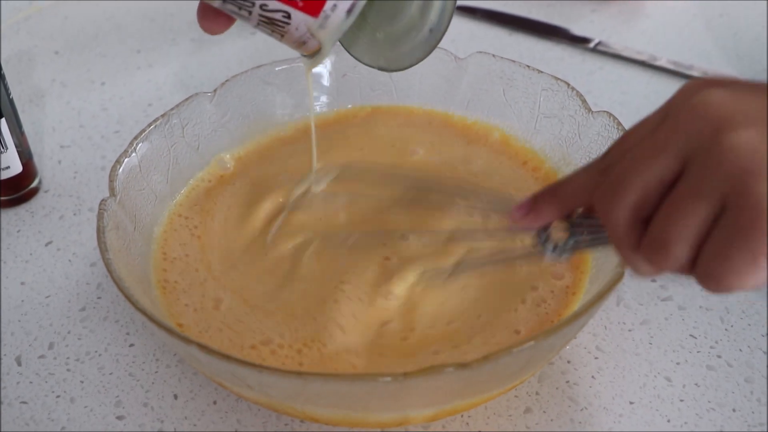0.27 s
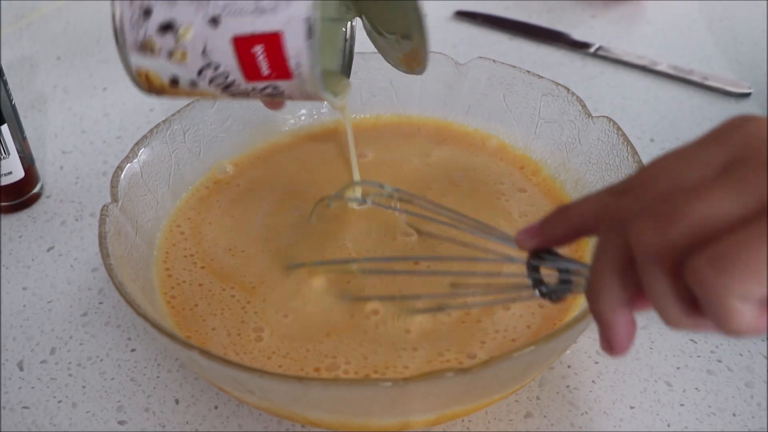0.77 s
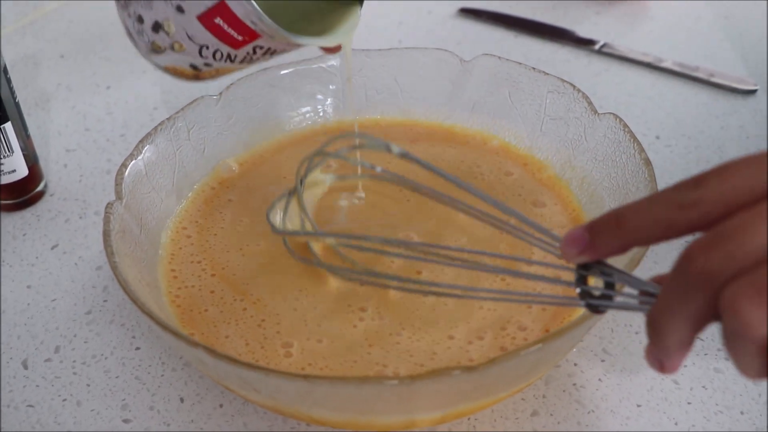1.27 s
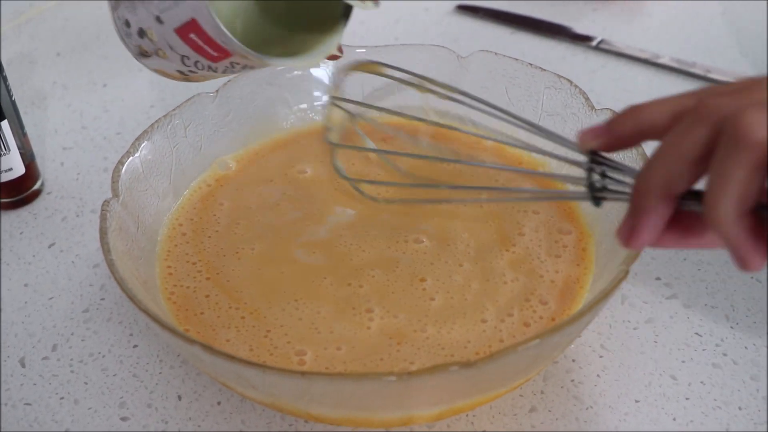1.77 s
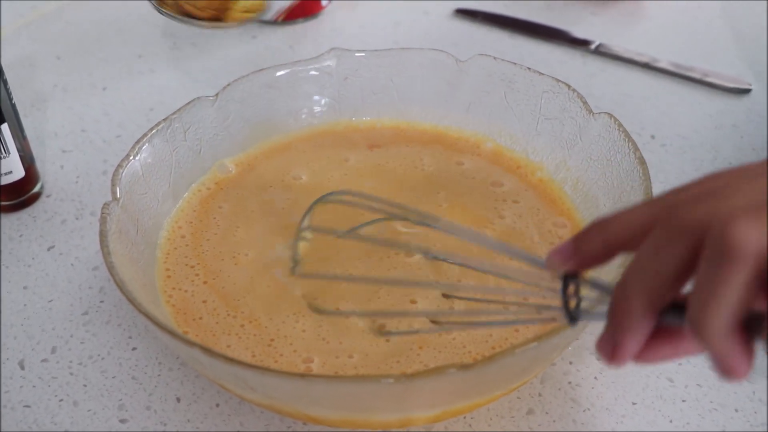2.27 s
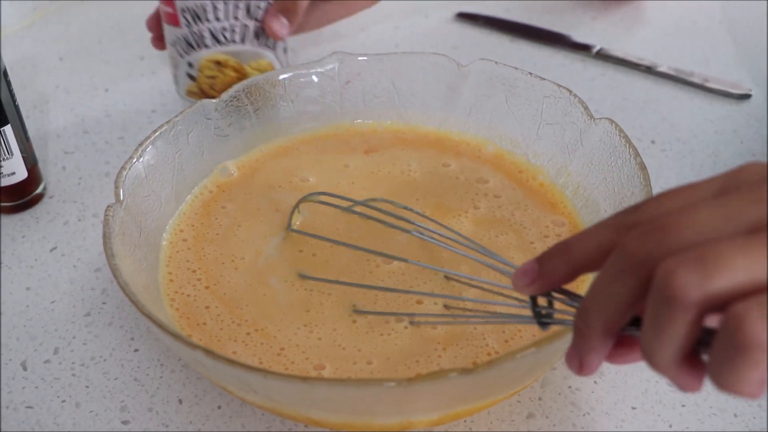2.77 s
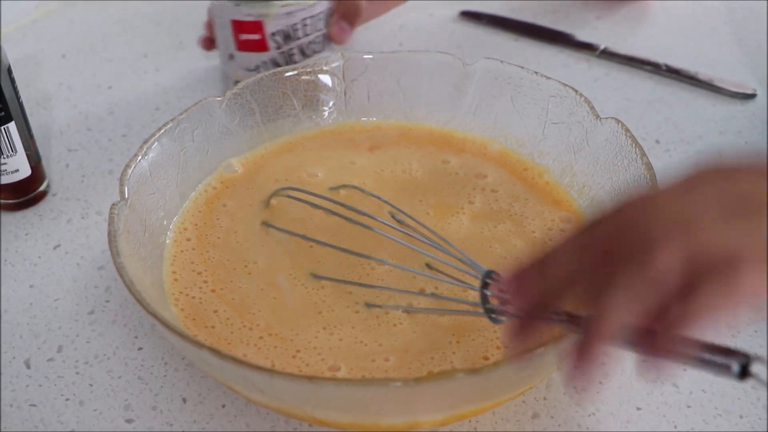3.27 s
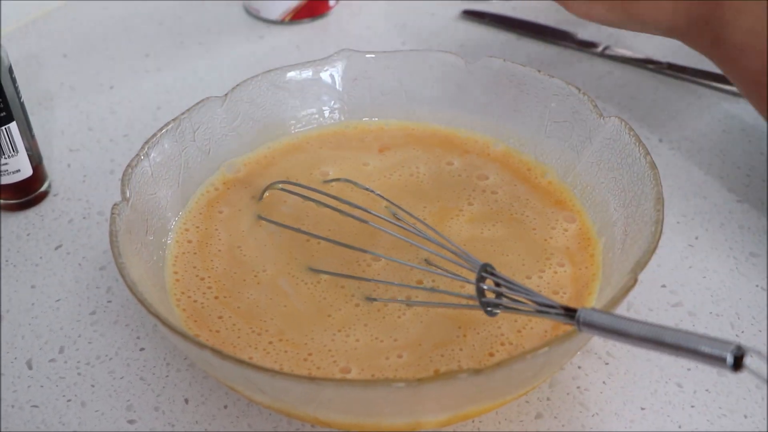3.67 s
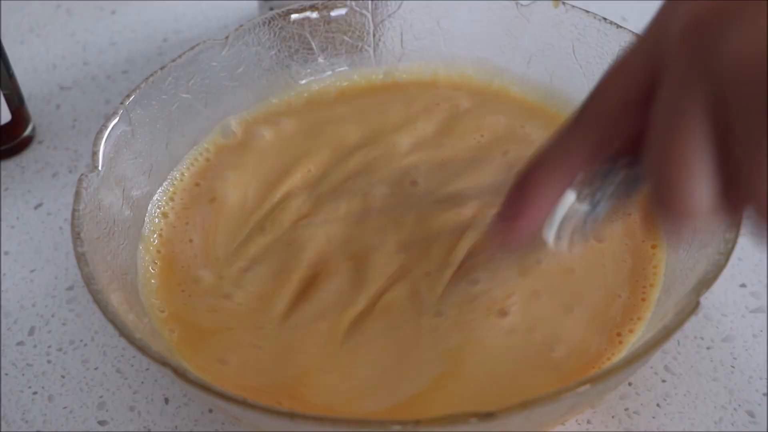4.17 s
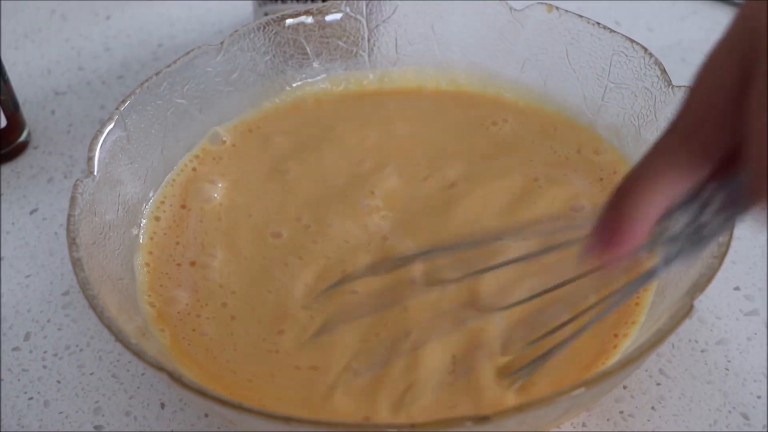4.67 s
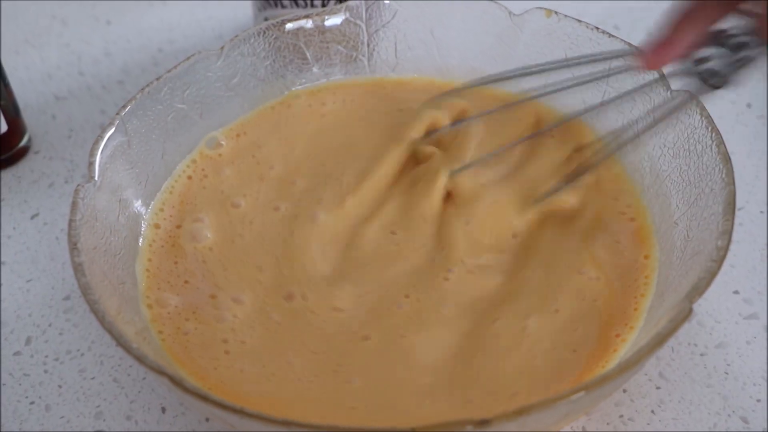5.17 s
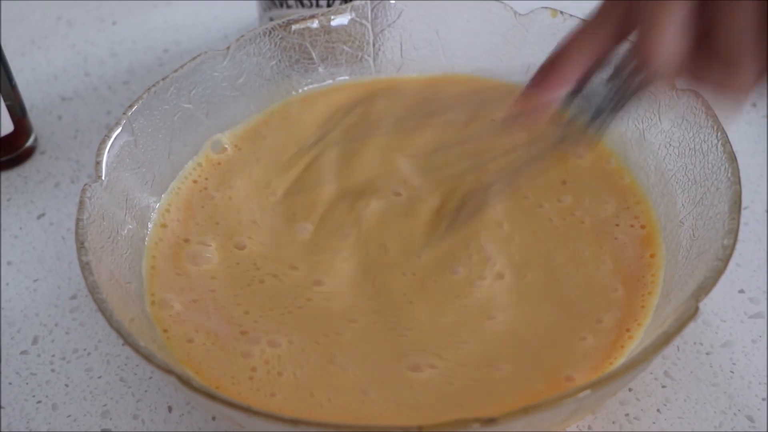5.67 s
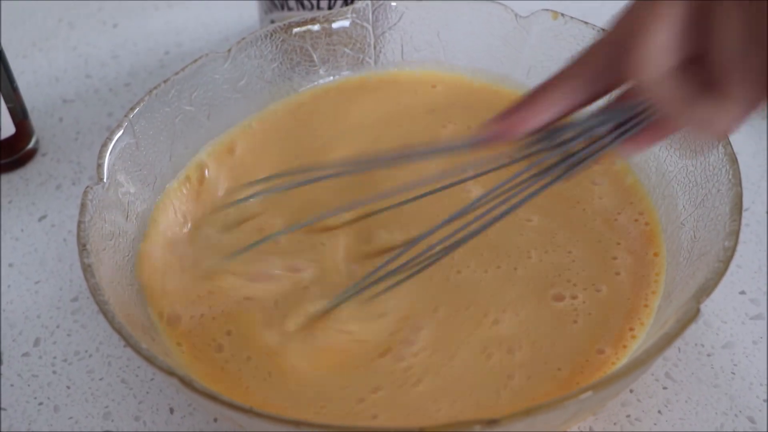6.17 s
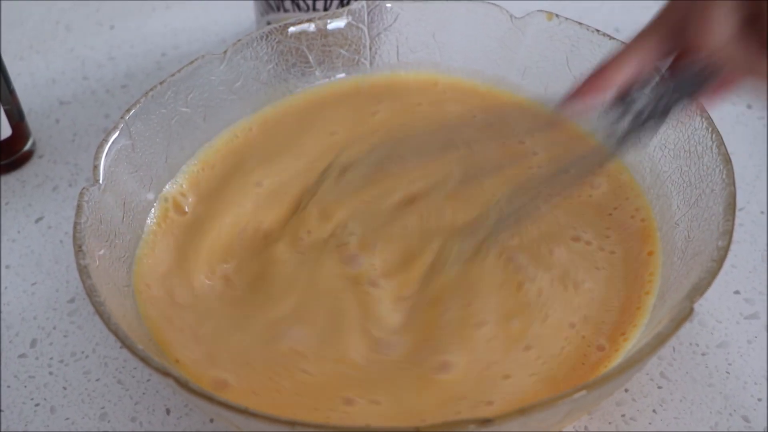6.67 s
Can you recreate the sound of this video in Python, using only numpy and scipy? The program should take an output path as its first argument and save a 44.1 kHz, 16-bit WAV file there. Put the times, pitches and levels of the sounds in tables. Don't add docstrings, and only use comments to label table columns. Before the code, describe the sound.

Close stereo camera pickup in a lightly echoing kitchen, with faint hiss and fridge hum. From 0 to 0.7 s a wire whisk gives soft, uneven ticks in batter, with light rubbing. A thin squeak at 0.8 s leads to a loud, hard knock at 0.94 s, the glass rim ringing brightly for about a third of a second. Quiet handling follows, then a low shove and drag around 2.0-2.2 s and small glass taps at 2.3-2.75 s. At 3.03 s a tin lands with the loudest clank, bounces at 3.1 s and scrapes; the whisk clatters onto the rim at 3.3-3.4 s. Near quiet lasts until 3.95 s, then complete silence until 4.16 s. Fast beating starts abruptly: dense, irregular clicks, damped glass rings, gritty scrapes, low bumps and wet slops, strongest around 5.2-6.3 s, with a faint hollow hum near 6.3 s, continuing to the end at about 7 s.

```python
import sys
import numpy as np
from scipy import signal
from scipy.fft import rfft, irfft, next_fast_len
from scipy.io import wavfile
from scipy.ndimage import uniform_filter1d

SR = 44100
rng = np.random.default_rng(int(sys.argv[2]) if len(sys.argv) > 2 else 0)


def bounce(signal):
    frames = np.transpose(np.atleast_2d(signal))
    limited = np.clip(frames, -1, 1)
    pcm = np.round(limited * 32767).astype(np.int16)
    wavfile.write(sys.argv[1], SR, pcm)


def boost_factor(decibels):
    exponent = np.asarray(decibels, float) / 20
    return 10 ** exponent


N = 305613
FAST = next_fast_len(N)

SCENE_CHANGE = (3.946, 4.1645)
# frequency in Hz, width in Hz, level in dB.
WET_BOWL = [(943, 200, -2.5), (1250, 64, -3), (1420, 215, 6.5), (2060, 390, 5), (2500, 440, 1),
            (3035, 470, -0.5), (3590, 240, -7), (4460, 1000, -7.5)]
# frequency in Hz, width in Hz, level in dB.
COUNTER = [(100.7, 8.3, 8), (123.7, 20.4, 20), (147, 17, 8), (200, 62, -16), (217, 18, 3), (262, 20, 6),
           (350, 16, -19)]


def evened(x):
    return x / np.sqrt(np.mean(x ** 2) + 1e-20)


def read(points, hz):
    f, value = np.transpose(points)
    return np.interp(np.log(hz + 1), np.log(f + 1), value)


def curves(table):
    s, *columns = np.transpose(table)
    return [np.interp(np.arange(N) / SR, s, c) for c in columns]


def add(mix, s, sound):
    part = mix[:, round(s * SR):][:, :sound.shape[1]]
    part += sound[:, :part.shape[1]]


def band(x, lo_hz, hi_hz):
    return signal.sosfilt(signal.butter(3, [lo_hz, hi_hz], "bandpass", fs=SR, output="sos"), x)


def resonate(x, hz, width):
    r = np.exp(-np.pi * width / SR)
    feedback = [1, -2 * r * np.cos(2 * np.pi * hz / SR), r * r]
    return signal.lfilter([(1 - r * r) / 2, 0, (r * r - 1) / 2], feedback, x)


def body(x, modes):
    return sum(boost_factor(db) * resonate(x, hz, width) for hz, width, db in modes)


def grit(per_s, spread_db):
    out = np.zeros((2, N))
    at = np.flatnonzero(rng.random(N) < per_s / SR)
    size = boost_factor(spread_db * np.minimum(rng.exponential(1, len(at)), 4))
    out[:, at] = size * rng.standard_normal((2, len(at)))
    return out


def thump(t):
    push = np.minimum(t / 0.0036, 1) * boost_factor(-60 * t / 0.0098)
    low = body(push * [[1], [.3]], COUNTER)
    return low / abs(low).max() * np.hanning(2 * len(t))[len(t):]


def pushes(rows, fall_db_s):
    rise_s = .018
    t = np.arange(0, N / SR + .01, .001)
    level = np.zeros(len(t))
    for s, db, held in rows:
        rise = np.clip((t - s) / rise_s, 0, 1) ** 2
        level += rise * boost_factor(db - fall_db_s * np.maximum(t - s - held, 0))
    return np.interp(np.arange(N) / SR, t, level)


def air():
    # frequency in Hz, level in dB per Hz.
    tone = [(25, -23.5), (102, -10), (140, -20), (335, -11), (650, -14.5), (1040, -16.5), (3620, -23.5),
            (16000, -38)]
    # frequency in Hz, likeness of left and right as a share.
    alike = [(60, 1), (240, 0.69), (950, 0.16), (3770, -1.4), (15000, 0.38)]
    # frequency in Hz, width in Hz, level in dB.
    fridge = [(130.7, 2.6, -69), (288.2, 8, -67.5), (519.5, 3, -60)]
    hz = np.fft.rfftfreq(FAST, 1 / SR)
    a, b = rfft(rng.standard_normal((2, FAST)))
    same = np.clip(read(alike, hz), 0, 1)
    z = np.array([a, same * a + np.sqrt(1 - same ** 2) * b]) * boost_factor(read(tone, hz))
    hum = 0
    for f, width, db in fridge:
        hum = hum + boost_factor(db) * evened(resonate(resonate(rng.standard_normal(N), f, width), f, width))
    return boost_factor(-51.5 + 1.46) * evened(irfft(z, FAST)[:, :N]) + hum


def slides(rows, slips):
    share, longest_s = .3, .04
    out = np.zeros((2, N))
    for s, length, db, hz, width in rows:
        u = np.arange(round(length * SR)) / (length * SR)
        rising = min(share, longest_s / length)
        swell = np.sin(np.pi / 2 * np.minimum(u / rising, (1 - u) / (1 - rising)))
        rub = slips[:, round(s * SR):][:, :len(u)]
        add(out, s, boost_factor(db + 2.5) * swell * evened(resonate(resonate(rub, hz, width), hz, 2.12 * width)))
    return out


def handling():
    # start in seconds, length in seconds, level in dB, centre in Hz, width in Hz.
    rows = [(0, .52, -57.5, 3000, 3700), (.74, .18, -57.5, 5300, 2100), (1.33, .48, -52, 1300, 1630),
            (1.4, .6, -57, 750, 350), (1.995, .19, -39.5, 720, 260), (1.995, .17, -29, 225, 110),
            (2.21, .2, -56, 4900, 2000), (2.21, .12, -63, 4700, 300), (2.235, .1, -58, 2100, 120),
            (2.0, .06, -46, 1750, 500), (2.06, .12, -46, 1600, 1300), (2.14, .25, -53, 1100, 1000),
            (1.0, .35, -55, 1500, 1500), (3.24, .1, -44, 1300, 250), (2.065, .07, -57, 5000, 4000),
            (2.0, .04, -61, 8000, 4000), (1.862, .04, -62, 3000, 4000), (.79, .1, -57, 2450, 300),
            (2.87, .12, -54, 3000, 1000), (3.1, .11, -33, 800, 110), (3.295, .06, -38, 860, 130),
            (3.1, .1, -46, 1900, 600), (2.46, .14, -56.5, 2100, 1100), (2.875, .11, -48.5, 4600, 2000),
            (2.874, .13, -48.5, 1500, 1500), (3.2, .12, -39, 810, 150), (3.06, .42, -42.5, 1500, 1000),
            (3.172, .19, -39, 4700, 2100), (3.17, .19, -48, 7900, 3500), (1.05, 1.2, -68, 3630, 40)]
    return slides(rows, grit(12000, 1.5))


def wires():
    # start in seconds, peak in dB, ring in Hz, fade to -60 dB in seconds.
    ticks = [(0.042, -39.5, 1500, .071), (0.1371, -35.5, 2500, .064), (0.19, -35, 2450, .039),
             (0.2647, -40.5, 1600, .063), (0.3227, -30.5, 2380, .029), (0.5646, -29.5, 2510, .017),
             (0.6514, -37, 2400, .11), (2.0193, -38, 1880, .033)]
    # start in seconds, peak in dB, ring in Hz, fade to -60 dB in seconds.
    clicks = [(0.0565, -31, 2770, .031), (0.0744, -40, 2490, .033), (4.3348, -29.5, 1840, .055),
              (4.3923, -32, 1500, .18), (4.547, -27, 3410, .07), (4.6537, -22, 1290, .044),
              (4.73, -36.5, 1100, .06), (4.766, -33.5, 3360, .024), (4.821, -39, 1120, .12),
              (4.9365, -30, 1850, .07), (4.972, -34, 1390, .05), (5.0678, -27, 2760, .09),
              (5.1921, -21, 1090, .055), (5.287, -29, 3500, .04), (5.428, -32, 4000, .025),
              (5.3155, -31, 2040, .027), (5.6895, -27.5, 2080, .02), (5.7643, -29.5, 1300, .037),
              (5.852, -25.5, 1420, .054), (6.0241, -18.5, 2050, .03), (6.067, -26, 3000, .025),
              (6.1985, -26.5, 2680, .06), (6.3769, -34.5, 3200, .04), (6.4687, -32, 3060, .072),
              (6.6722, -30.5, 1390, .11), (6.7175, -31, 3300, .026), (6.899, -39, 2020, .05)]
    # start in seconds, peak in dB, ring in Hz, fade to -60 dB in seconds.
    beats = [(4.166, -36, 1340, .046), (4.1836, -35, 2280, .13), (4.2027, -27.5, 2660, .064),
             (4.2266, -28.5, 3420, .071), (4.279, -40, 1000, .18), (4.6177, -30, 2680, .049),
             (4.6317, -31, 1960, .14), (4.8537, -23.5, 1010, .18), (5.0468, -28, 2060, .087),
             (5.1127, -27.5, 1880, .18), (5.1571, -26.5, 1840, .06), (5.2605, -18.5, 1930, .043),
             (5.3446, -32, 2060, .06), (5.398, -24.5, 1130, .076), (5.565, -16.5, 1326, .047),
             (5.599, -27, 3480, .08), (5.7088, -21.5, 1250, .032), (5.788, -32, 1400, .05),
             (5.9343, -23, 1060, .03), (5.9805, -32.5, 2250, .081), (6.0788, -31, 1410, .021),
             (6.1477, -31, 1660, .07), (6.2605, -16.5, 3450, .05), (6.3433, -35, 3600, .052),
             (6.4306, -30.5, 2180, .1), (6.4404, -33, 1420, .075), (6.5708, -32, 2790, .1),
             (6.6527, -36, 3080, .04), (6.7346, -32, 1320, .06), (6.8613, -26.5, 1800, .03)]
    # treble in dB against the body, rise in seconds.
    slow = (-13, .004)
    bare = (-2.5, .0018)
    cushioned = (-16, .0025)
    out, t = np.zeros((2, N)), np.arange(4000) / SR
    kinds = (ticks, slow), (clicks, bare), (beats, cushioned)
    rows = [(*row, *kind) for table, kind in kinds for row in table]
    push = thump(t)
    chance = rng.standard_normal((len(rows), 3, len(t)))
    spots = rng.standard_normal((len(rows), len(WET_BOWL)))
    for (s, db, hz, t60, treble_db, rise), draw, spot in zip(rows, chance, spots):
        after = np.maximum(t - rise, 0)
        fade = boost_factor(-60 * after / max(t60, .008)) + 0.5 * boost_factor(-60 * after / .012)
        flurry = draw[:2] * boost_factor(3.13 * draw[2]) * np.minimum(t / rise, 1) ** 2 * fade
        bowl = body(flurry, [(f, w, g + 3.6 * a) for (f, w, g), a in zip(WET_BOWL, spot)])
        low = band(evened(bowl) + evened(resonate(flurry, hz, 135)), 980, 11800)
        high = resonate(flurry, 6400, 4000) + 0.9 * resonate(flurry, 7940, 270)
        high = band(high, 5300, 15500)
        tick = low / abs(low[0]).max() + boost_factor(treble_db) * high / abs(high[0]).max()
        add(out, s, boost_factor(db + 5.0) * (tick + boost_factor(-18) * push))
    return out


def counter():
    # start in seconds, level in dB, hold in seconds.
    jolts = [(.49, -40, .06), (.81, -44, .05), (.94, -36, .04), (1.4, -39, .08), (1.995, -21, .05),
             (2.06, -20, .055), (2.15, -30, .04), (2.3, -43, .05), (2.805, -36, .12), (3.04, -46, .05),
             (3.27, -44, .06), (3.375, -35, .03)]
    # start in seconds, level in dB, hold in seconds.
    strokes = [(4.19, -39, .06), (4.32, -42, .05), (4.43, -41, .12), (4.66, -41, .04), (4.85, -37, .07),
               (5.05, -37, .05), (5.17, -39, .05), (5.26, -37, .04), (5.385, -35, .05), (5.56, -35, .07),
               (5.705, -36, .03), (5.84, -36, .04), (5.93, -28, .03), (6.02, -31, .04), (6.14, -34, .05),
               (6.37, -38, .08), (6.57, -38, .04), (6.66, -36, .03), (6.76, -42, .04), (6.84, -41, .05)]
    # start in seconds, level in dB, hold in seconds.
    nudges = [(1.12, -44, .08), (1.27, -50, .05), (1.4, -39, .09), (1.54, -48, .03), (2.0, -43, .2),
              (2.85, -50, .1), (4.2, -48, .2)]
    boom = band(body(grit(400, 1.28), COUNTER), 65, 400)
    boom = boom / np.sqrt(uniform_filter1d(uniform_filter1d(boom ** 2, 2600), 2600) + 1e-9)
    sway = band(rng.standard_normal((2, N)), 24, 76)
    sway = sway / np.sqrt(uniform_filter1d(sway ** 2, 8000) + 1e-12)
    shoves = boost_factor(-58) + pushes(jolts, 190) + pushes(strokes, 300)
    return shoves * boom + boost_factor(-5.1) * (boost_factor(-57) + pushes(nudges, 200)) * sway


def singing(path, width_hz, edge_s):
    hz, db = curves(path)
    slow = signal.lfilter([1], [1, -np.exp(-np.pi * width_hz / SR)], rng.standard_normal((2, 2, N)))
    tone = ((slow[0] + 1j * slow[1]) * np.exp(2j * np.pi * np.cumsum(hz) / SR)).real
    t = np.arange(N) / SR
    inside = np.clip(np.minimum(t - path[0][0], path[-1][0] - t) / edge_s, 0, 1)
    return boost_factor(db) * inside * evened(tone)


def squeak():
    # time in seconds, pitch in Hz, level in dB.
    path = [(0.68, 2000, -60), (0.74, 2130, -52), (0.79, 2000, -47), (0.83, 2150, -50), (0.92, 2050, -57)]
    return singing(path, 70, .04)


def struck(hits, modes_hz, modes, crack_db, crack_hz, blow):
    out, t = np.zeros((2, N)), np.arange(11000) / SR
    hz, (db, t60) = np.array(modes_hz)[:, None], np.transpose(modes)[:, :, None]
    spots = rng.standard_normal((len(hits), 3, len(modes), 1))
    cracks = rng.standard_normal((len(hits), 2, 2000))
    for (s, peak_db, hard_db, damping), (spot, turn, split), crack in zip(hits, spots, cracks):
        level_db = db + hard_db * np.log2(hz / 1000) + 0.61 * spot
        fade = boost_factor(level_db - 60 * damping * t / t60) * np.minimum(t / .0012, 1)
        fade = fade * (1 + 0.45 * np.cos(2 * np.pi * 0.0083 * hz * (1 + .12 * split) * t + 0.3 * turn))
        fade = fade * (1 + blow * boost_factor(-60 * t / 0.035))
        spin = fade * np.exp(2j * np.pi * hz * t)
        side = spin * np.exp(1j * (np.pi / 2 + 0.4 * turn))
        ring = np.array([spin.sum(0).imag, side.sum(0).imag])
        crack = signal.lfilter([1], [1, -np.exp(-2 * np.pi * crack_hz / SR)], crack)
        crack = band(crack * boost_factor(-60 * t[:2000] / 0.029), 520, 10000)
        add(out, s, boost_factor(peak_db) * band(ring / abs(ring[0]).max(), 390, 15000))
        add(out, s, boost_factor(peak_db + crack_db + .5 * hard_db) * crack / abs(crack[0]).max())
        add(out, s, boost_factor(peak_db - 13.5) * band(thump(t[:5000]), 210, 700))
    return out


def tin():
    # start in seconds, peak in dB, hardness in dB per octave, damping as a factor.
    knocks = [
        (0.937, 2, 2.5, 1.0),
        (2.864, -33, -10.5, 1.5),
        (3.029, 7, -2.5, 2),
        (3.098, -1.5, 1.5, 1.7),
        (3.3, -20, -4, 1.1),
    ]
    modes_hz = [520, 700, 745, 775, 860, 1090, 1244, 1330, 1950, 2400, 3640, 4900]
    # level in dB, fade to -60 dB in seconds.
    modes = [(-16, 0.027), (-24, 0.048), (0.5, 0.057), (-11.5, .2), (-9.5, 0.068), (-17.5, 0.27),
             (-12, 0.058), (4.5, 0.017), (-11, 0.04), (-8, 0.025), (-13.5, 0.013), (-20, .015)]
    return struck(knocks, modes_hz, modes, -23.5, 1000, 3.5)


def rim():
    # start in seconds, peak in dB, hardness in dB per octave, damping by hand and batter as a factor.
    hits = [(0.9374, -4, -5, 1.15)]
    # start in seconds, peak in dB, hardness in dB per octave, damping as a factor.
    taps = [(2.3294, -24.5, 2, 1.2), (2.365, -37, 5, 1.5), (2.4238, -36, 6, 1.5), (2.5205, -38, -3, 1.5),
            (2.716, -44, -3, 2), (2.7546, -28, 6, 1.2)]
    # start in seconds, peak in dB, hardness in dB per octave, damping as a factor.
    drops = [(3.302, -31, 3, 2), (3.358, -33, 0, 2), (3.3864, -20, 0, 2), (3.3937, -17, 1, 2),
             (3.4024, -27, 2, 2)]
    modes_hz = [385, 1001, 1480, 1757, 2713, 3785, 5020, 6390, 7940, 9660, 11500]
    # level in dB, fade to -60 dB in seconds.
    free = [(-17, 0.44), (1, 0.36), (-12, 0.15), (4, 0.36), (-3, 0.33), (-8, 0.3), (-3, 0.4), (-17, .2),
            (-11, .17), (-22, 0.13), (-21, 0.06)]
    # level in dB, fade to -60 dB in seconds.
    held = [(-25, 0.3), (-3, 0.24), (-20, 0.1), (1, 0.24), (-13, 0.2), (-14, 0.12), (-4, 0.27), (-13, .15),
            (-9, .16), (-24, 0.1), (-22, 0.06)]
    # level in dB, fade to -60 dB in seconds.
    wet = [(-2, 0.6), (-1, 0.35), (-2, 0.1), (-1, 0.13), (-2, 0.28), (-14, 0.13), (-7, 0.25), (-17, .15),
           (-15, .12), (-23, 0.1), (-24, 0.054)]
    ring = struck(hits, modes_hz, free, -4.5, 3000, 0.7)
    ring += struck(taps, modes_hz, held, -4.5, 2600, 1.3)
    return ring + struck(drops, modes_hz, wet, -5.5, 2100, 1.3)


def rubbing():
    # time in seconds, scrape level in dB.
    pressure = [(4.35, -48), (4.61, -46.5), (4.82, -52), (4.91, -41), (5.03, -48), (5.27, -41), (5.55, -55),
                (5.6, -48.5), (5.77, -48), (5.95, -41), (6.2, -50), (6.36, -45), (6.41, -52), (6.5, -44),
                (6.64, -48), (6.8, -43), (6.93, -47)]
    drift = uniform_filter1d(uniform_filter1d(rng.standard_normal(N), 500), 300)
    slips = boost_factor(4.2 * evened(drift)) * grit(5000, 2.1)
    mix = evened(body(slips, WET_BOWL))
    mix = mix + 0.2 * evened(resonate(slips, 3330, 4700)) + 0.16 * evened(resonate(slips, 580, 750))
    return boost_factor(curves(pressure)[0] - 2.0) * mix * (np.arange(N) / SR > SCENE_CHANGE[0])


def scrapes():
    # start in seconds, length in seconds, level in dB, centre in Hz.
    rows = [(4.19, .055, -40.5, 4500), (4.415, .04, -41, 4470), (4.535, .035, -36.5, 3970),
            (4.646, .026, -37, 3930), (4.845, .085, -36.5, 1910), (5.383, .032, -34, 3330),
            (6.425, .12, -46, 3020), (6.57, .068, -45.5, 3500)]
    return slides([(*row, 1.42 * row[-1]) for row in rows], grit(5000, 4.2))


def blips():
    # start in seconds, peak in dB, ring in Hz.
    rows = [(4.251, -29, 2400), (4.407, -30, 1500), (4.441, -28, 1390), (4.469, -33, 1750),
            (4.499, -31, 1390), (4.557, -21, 3660), (4.679, -33, 3490), (4.874, -28, 958),
            (5.011, -33, 1100), (5.025, -31, 1250), (5.127, -24, 1850), (5.214, -26, 2170),
            (5.419, -30, 2080), (5.579, -24, 1900), (5.644, -31, 1390), (5.724, -31, 3200),
            (5.795, -22, 2120), (5.809, -31, 3300), (5.867, -25, 1030), (5.894, -28, 2900),
            (5.919, -27, 3000), (6.027, -17, 3250), (6.08, -20, 1410), (6.115, -31, 1420),
            (6.135, -31, 2430), (6.164, -29, 2990), (6.284, -21, 1270), (6.297, -23, 1410),
            (6.322, -32, 1420), (6.416, -31, 1800), (6.504, -31, 1350), (6.599, -31, 3270),
            (6.689, -31, 902), (6.759, -31, 2220), (6.784, -34, 950), (6.839, -30, 4500),
            (6.871, -30, 2200)]
    rise_s, t60_s, width = .003, .035, .17
    out, t = np.zeros((2, N)), np.arange(2500) / SR
    shape = np.minimum(t / rise_s, 1) ** 2 * boost_factor(-60 * t / t60_s)
    for (s, db, hz), draw in zip(rows, rng.standard_normal((len(rows), 2, len(t)))):
        ring = resonate(resonate(shape * draw, hz, width * hz), hz, 3.0 * width * hz)
        add(out, s - rise_s, boost_factor(db - 4.5) * ring / abs(ring[0]).max())
    return out


def bubbles():
    t = np.arange(1200) / SR
    out = np.zeros((2, N))
    for hz in np.geomspace(330, 1500, num=7):
        plop = np.sin(2 * np.pi * hz * t * (1 + 5.34 * t)) * t * np.exp(-t * hz / 2.8)
        out += signal.oaconvolve(grit(45, 2.1), [plop], axes=1)[:, :N] * hz
    return out


def sloshes():
    # start in seconds, length in seconds, level in dB, centre in Hz, width in Hz.
    rows = [(4.265, .08, -38, 520, 700), (4.43, .1, -43.5, 330, 350), (4.85, .059, -33, 900, 700),
            (5.108, .05, -36.5, 840, 300), (5.845, .066, -35.5, 720, 800), (4.46, .05, -46, 420, 250),
            (5.89, .06, -44, 750, 400), (6.66, .05, -47, 900, 300), (6.278, .027, -34, 1350, 300),
            (6.8, .09, -43.5, 1000, 400)]
    return slides(rows, evened(bubbles()) + 3.5 * evened(grit(4000, 1.8)))


def bowl_hum():
    # time in seconds, pitch in Hz, level in dB.
    path = [(6.13, 420, -48), (6.2, 410, -44), (6.26, 390, -50), (6.31, 385, -41), (6.41, 375, -50)]
    return singing(path, 12, .02)


def ports(x):
    # frequency in Hz, side against mid in dB.
    side_gain = [(100, -27.5), (400, -13.5), (1000, -7.5), (2500, -1), (6000, -0.5)]
    # frequency in Hz, share of the mid that leans left.
    lean = [(60, .25), (150, 0.22), (350, .05), (1000, 0.005)]
    hz = np.fft.rfftfreq(FAST, 1 / SR)
    mid, other = rfft(x, FAST)
    side = irfft(boost_factor(read(side_gain, hz)) * other + read(lean, hz) * mid, FAST)[:N]
    return np.array([x[0] + side, x[0] - side])


def kitchen(x):
    # frequency in Hz, fade to -60 dB in seconds.
    fade = [(125, 0.25), (500, 0.6), (1400, 0.32), (4000, 0.27), (8000, 0.18), (14000, 0.24)]
    taps = np.zeros((2, SR // 2))
    at = np.arange(200, SR // 2 - 20, 20) + rng.integers(0, 20, (2, (SR // 2 - 201) // 20))
    np.put_along_axis(taps, at, rng.choice([-1., 1.], at.shape), 1)
    hz, t, z = signal.stft(taps, SR, nperseg=256)
    tail = signal.istft(z * boost_factor(-60 * t / read(fade, hz)[:, None]), SR, nperseg=256)[1]
    tail = tail + .5 * tail[::-1]
    return signal.fftconvolve(x[None], tail / np.linalg.norm(tail[0]), axes=1)[:, :N]


def scene():
    whisking = wires() + scrapes() + blips() + sloshes()
    knocks = tin() + rim()
    near = whisking + knocks + handling() + counter() + squeak() + rubbing() + bowl_hum()
    return ports(near) + kitchen(boost_factor(-10.5) * whisking[0] + boost_factor(-10) * knocks[0]) + air()


def roll_off(x):
    return signal.sosfilt(signal.butter(12, 16490, fs=SR, output="sos"), x)


def record(dry):
    t = np.arange(N) / SR
    power_db = 10 * np.log10(signal.lfilter([.01], [1, -.99], (dry ** 2).mean(0)) + 1e-12)
    held_db = np.maximum.accumulate(power_db + 39.97 * t) - 41.6 * t
    over_db = signal.lfilter([.004], [1, -.996], np.maximum(held_db + 4, 0))
    x = np.clip(dry / boost_factor(1.2 * over_db), -1, 1)
    x = signal.oaconvolve(x, signal.firwin(255, 15900, fs=SR)[None], "same")
    x = x * np.where(t > SCENE_CHANGE[1], 1, np.clip((SCENE_CHANGE[0] - t) / .002, 0, 1))
    return roll_off(x)


dry = scene()
out = record(dry)
bounce(out)
```